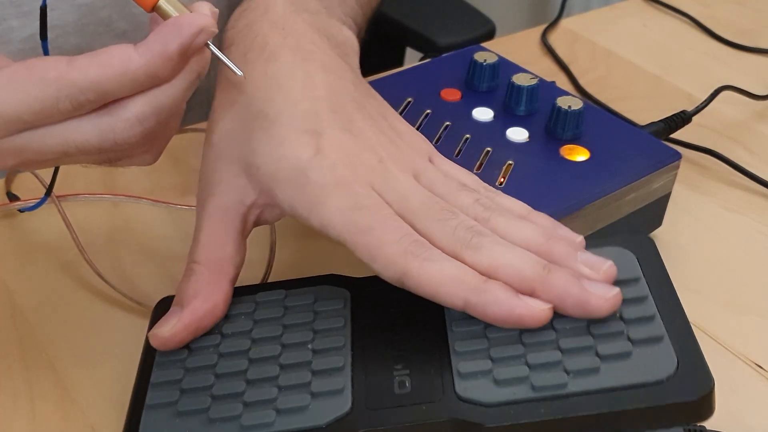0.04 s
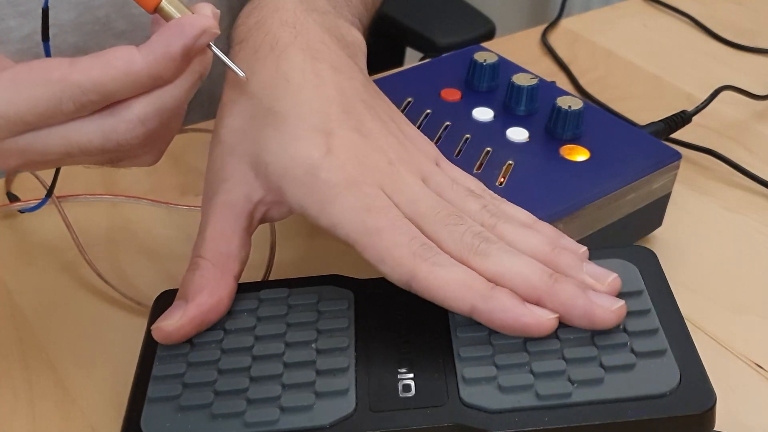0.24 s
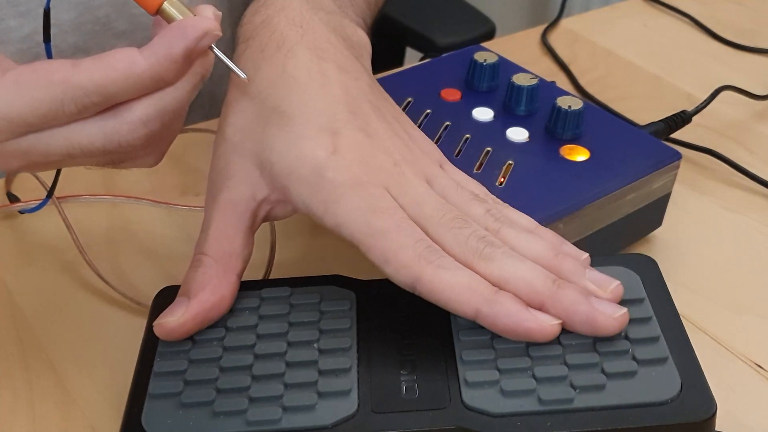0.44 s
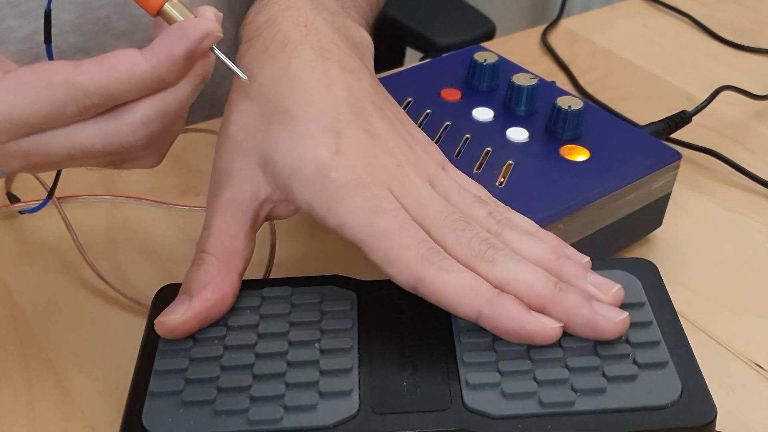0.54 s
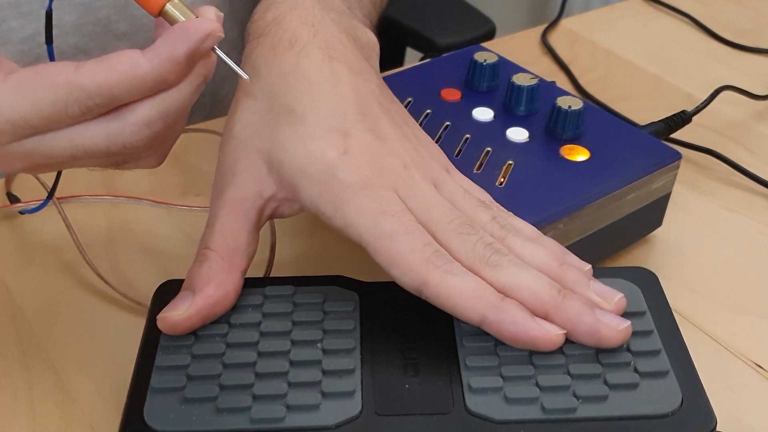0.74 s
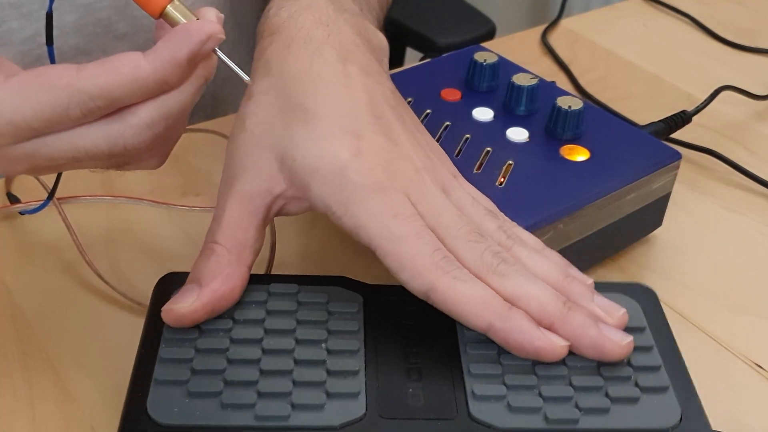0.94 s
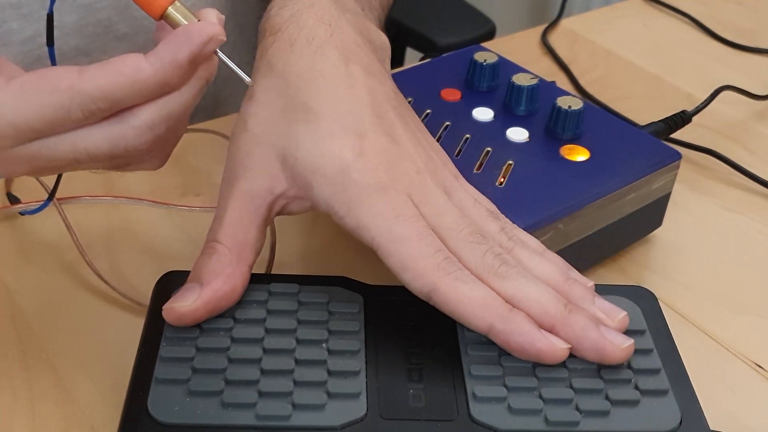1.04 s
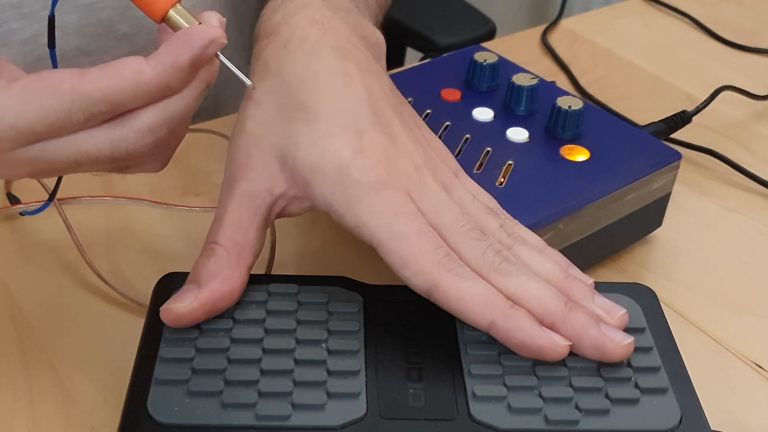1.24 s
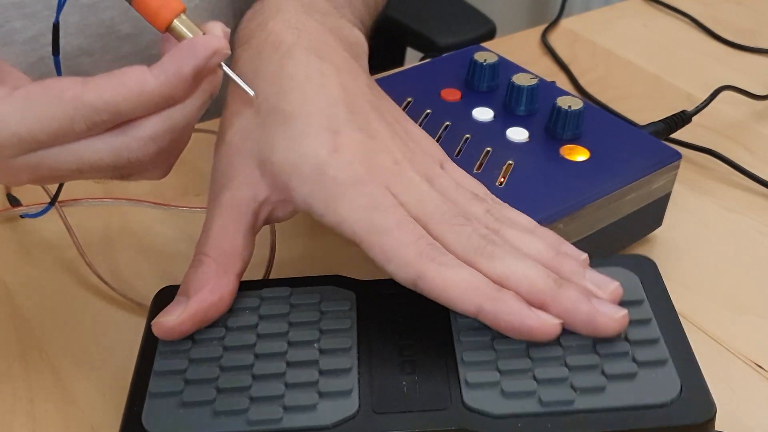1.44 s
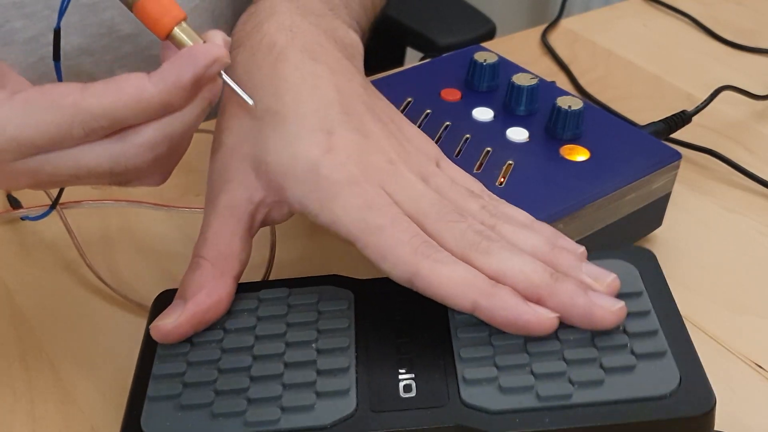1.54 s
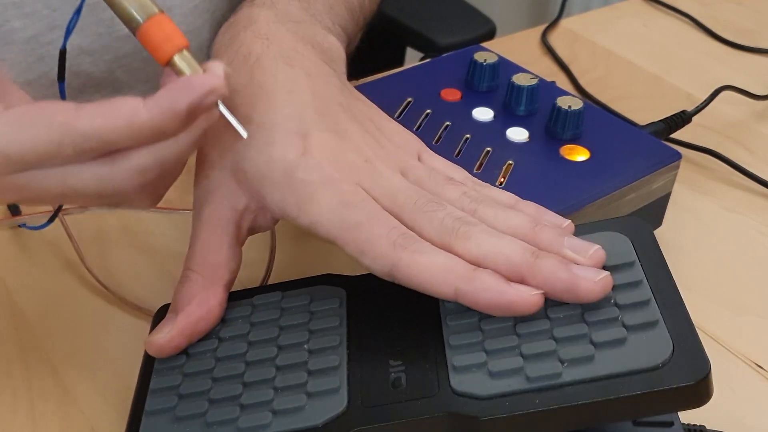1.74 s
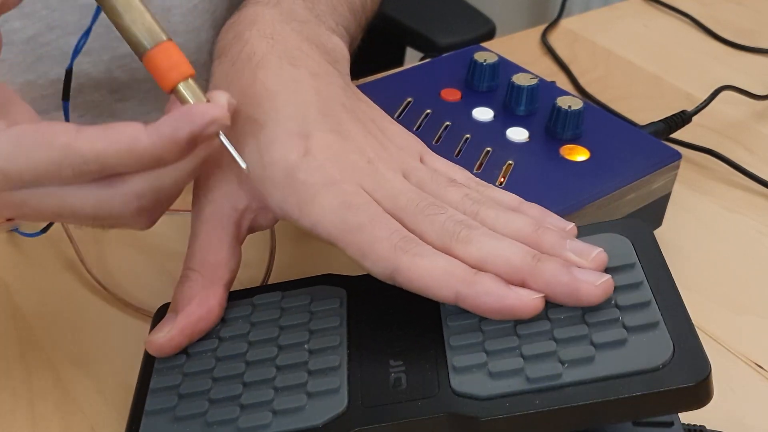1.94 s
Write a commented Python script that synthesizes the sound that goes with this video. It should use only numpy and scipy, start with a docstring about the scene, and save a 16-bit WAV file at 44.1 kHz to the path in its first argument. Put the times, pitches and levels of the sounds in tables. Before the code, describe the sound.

Close to the microphone in a small workshop, an electric engraving tool hammers in one burst. Its sharp, ringing taps quicken into a rattling buzz, hold there, and spread out again before stopping, over a faint low rumble.

```python
"""Solenoid engraver in a small workshop

A hand-held engraver works just right of a stereo microphone. A hand presses the pedal and the plunger
speeds up from single blows to a fast buzz, then slows again. Each blow thuds in the barrel, rings the
metal and rattles the tip; near walls echo it and the room answers. The pedal creaks faintly and bumps
the table, over quiet workshop air and the low rumble of the tool."""
import sys
import numpy as np
from scipy import signal
from scipy.fft import rfft, irfft
from scipy.io import wavfile

SR = 44100
rng = np.random.default_rng(int(sys.argv[2]) if len(sys.argv) > 2 else 0)


def dump(signal):
    """Clip the signal to [-1, 1] and save it as 16-bit WAV at the path in sys.argv[1]."""
    limited = np.clip(np.atleast_2d(signal).T, -1, 1)
    pcm = np.round(limited * 32767).astype(np.int16)
    wavfile.write(sys.argv[1], SR, pcm)


N = 88200


def undb(db):
    return 10 ** (np.asarray(db, float) / 20)


def decay(t, t60):
    return np.exp(-np.log(1000) * t / t60)


def at(table, hz):
    """Read (Hz, value) points on a log-frequency axis."""
    freqs, values = np.array(table, float).T
    return np.interp(np.log(np.maximum(hz, 1)), np.log(freqs), values)


def noise(spectrum, shared, size):
    """Stereo noise at rms 1, with a fraction of its power shared by both sides."""
    white = rng.standard_normal((3, size))
    pair = np.sqrt(shared) * white[0] + np.sqrt(1 - shared) * white[1:]
    gain = undb(at(spectrum, np.fft.rfftfreq(size, 1 / SR)))
    coloured = irfft(rfft(pair) * gain, size)
    return coloured / np.sqrt(np.mean(coloured ** 2))


def ring(t, modes, chance=0, scatter_db=1.2, detune=0.004):
    """Decaying sines from t = 0; chance shifts each level and pitch."""
    hz, db, t60 = np.array(modes, float).T[:, :, None]
    shift = np.zeros((len(modes), 2)) + chance
    level = undb(db + scatter_db * shift[:, :1])
    pitch = hz * (1 + detune * shift[:, 1:])
    t = np.maximum(t, 0)
    return np.sum(level * np.sin(2 * np.pi * pitch * t) * decay(t, t60), axis=0)


def add(out, sound, start_s):
    start = int(start_s * SR)
    count = min(sound.shape[-1], N - start)
    out[..., start:start + count] += sound[..., :count]


# Plunger blows, near the microphone (time [s], clack level [dB], treble level [dB])
BLOWS = [(0.202, -32.1, -30.6), (0.2562, -25.0, -23.9), (0.301, -24.0, -23.5), (0.3444, -23.2, -21.8),
         (0.3856, -22.7, -21.6), (0.4226, -22.3, -21.8), (0.4575, -22.7, -22.5), (0.4899, -22.8, -21.7),
         (0.5199, -22.0, -21.3), (0.5483, -23.2, -22.1), (0.5758, -21.1, -21.4), (0.6035, -22.1, -21.4),
         (0.6288, -21.8, -20.5), (0.6525, -23.2, -22.9), (0.6777, -21.9, -21.6), (0.7013, -21.6, -20.6),
         (0.7235, -20.7, -21.2), (0.7438, -22.6, -21.9), (0.7648, -21.5, -20.6), (0.7843, -22.4, -22.2),
         (0.8035, -22.0, -21.5), (0.823, -21.3, -21.0), (0.8414, -22.6, -20.9), (0.86, -22.2, -22.1),
         (0.8774, -22.0, -21.3), (0.8952, -22.3, -21.2), (0.9124, -21.4, -22.0), (0.9289, -22.2, -21.6),
         (0.945, -22.5, -21.0), (0.9596, -21.6, -22.1), (0.9763, -22.0, -21.0), (0.9932, -21.9, -22.1),
         (1.0089, -23.1, -21.1), (1.0248, -21.9, -21.3), (1.0394, -21.9, -23.4), (1.0562, -21.1, -21.1),
         (1.0731, -21.1, -20.7), (1.0877, -23.7, -22.2), (1.1046, -21.9, -20.4), (1.1207, -22.4, -21.2),
         (1.1364, -22.4, -21.0), (1.1529, -21.2, -20.8), (1.1677, -23.0, -22.7), (1.1844, -20.9, -20.3),
         (1.2006, -21.1, -21.6), (1.2146, -25.1, -24.4), (1.2326, -21.3, -20.8), (1.2489, -22.4, -20.8),
         (1.2646, -21.4, -21.5), (1.2805, -20.5, -21.5), (1.2944, -25.7, -22.6), (1.3126, -21.3, -21.0),
         (1.3287, -21.1, -20.9), (1.3434, -22.1, -22.0), (1.3603, -21.4, -21.0), (1.3771, -21.5, -21.8),
         (1.3928, -22.0, -21.3), (1.4087, -21.5, -20.9), (1.4233, -22.0, -22.5), (1.4401, -21.3, -20.8),
         (1.4569, -21.1, -20.6), (1.4717, -23.8, -21.5), (1.4884, -21.0, -20.5), (1.5057, -21.8, -23.1),
         (1.5271, -20.3, -21.8), (1.5496, -21.8, -22.0), (1.5749, -20.8, -20.8), (1.6019, -21.5, -21.1),
         (1.631, -20.6, -22.0), (1.6664, -20.7, -20.9), (1.7113, -22.0, -21.4)]
# Broad, quickly damped barrel resonances (frequency [Hz], level [dB], t60 [s])
BARREL_MODES = [(605, -19.5, 0.0084), (793, -26, 0.05), (1080, -9.5, 0.009), (1310, 3.5, 0.0061),
                (1574, 3.5, 0.0056), (2444, -7.5, 0.011), (3257, -8, 0.014), (4294, -13.5, 0.014)]
# Metal modes of plunger and tip (frequency [Hz], level [dB], t60 [s])
METAL_MODES = [(5300, -11.5, 0.015), (6078, -10.5, 0.048), (6210, -12, 0.036), (6960, -8.5, 0.013),
               (8430, -5, .008), (9190, -7, 0.012), (11320, -14, 0.018), (11100, -12.5, 0.06),
               (11580, -10.5, 0.023)]
# Rattle of the tip (frequency [Hz], relative level [dB])
RATTLE_SPECTRUM = [(1000, -47), (2000, -3.5), (3000, -4), (5000, -3.5), (6100, -0.5), (7400, -6.5),
                   (9000, -1.5), (11500, -4.5), (13000, -6), (15500, -6.5), (17000, -47)]
def engraver(rattle_db=-2.5, chatter_db=-41, radiates_hz=480):
    """Each blow: the same dull barrel clack, then a metal ring and a rattle that differ every time."""
    out, t = np.zeros((2, N)), np.arange(5000) / SR
    sides = (t, t - 0.00005)  # left, right: a slight lag between the channels
    barrel_times = [np.maximum(side - 0.00034, 0) for side in sides]
    clack = np.array([ring(u, BARREL_MODES) * (1 - np.exp(-u / 0.00048)) for u in barrel_times])
    hiss = noise(RATTLE_SPECTRUM, shared=0.43, size=N)
    rattle_s = np.array([[0.0035], [0.0027]])  # left, right
    burst = (1 - np.exp(-(t / 0.001) ** 2)) * np.exp(-(t / rattle_s) ** 2)
    # The loose plunger chatters on after every blow, however soft.
    chatter = undb(chatter_db) * (1 - np.exp(-t / 0.0047)) * decay(t, t60=0.18)
    for start, clack_db, treble_db in BLOWS:
        chance = rng.standard_normal((len(METAL_MODES), 2))
        metal = np.array([ring(side - 0.001005, METAL_MODES, chance) for side in sides])
        grit = np.roll(hiss, -int(start * SR), axis=1)[:, :len(t)]
        rattle = grit * burst * np.std(burst) / np.std(grit * burst)  # as strong as its envelope
        treble = metal + undb(rattle_db) * rattle
        add(out, undb(clack_db) * clack + undb(treble_db) * treble + chatter * grit, start)
    # The tool is too small to radiate bass.
    return signal.sosfilt(signal.butter(4, radiates_hz, "high", fs=SR, output="sos"), out)


# Table and walls close to the microphone (delay [s], left level [dB], right level [dB])
ECHOES = [(.0017, -12.5, -32), (.0062, -41.5, -5.5), (.0085, -6, -23), (.0098, -23, -13.5),
          (0.0115, -27, -11.5), (0.013, -6, -25.5)]
def near_echoes(tool):
    """Each nearby surface returns one late, weaker copy of the tool."""
    out = np.zeros((2, N))
    for delay, left_db, right_db in ECHOES:
        add(out, undb([[left_db], [right_db]]) * tool, delay)
    return out


# Decay of the small workshop (frequency [Hz], t60 [s])
ROOM_T60 = [(300, .35), (800, .4), (1500, .31), (3000, .34), (6100, .35), (8000, .27), (11000, .23),
            (15000, .16)]
# Colour of its reverberation at the microphone (frequency [Hz], relative level [dB])
ROOM_SPECTRUM = [(300, 0.012), (800, 0.5), (1400, -2.5), (2200, 0), (4000, 0.036), (6100, -1),
                 (8000, 0.0097), (11500, 0), (15000, 0.0032)]
def room(tool, rise_s=0.01, size=2 ** 15):
    """Dense reflections build up quickly and die sooner in the treble."""
    t, tail = np.arange(size) / SR, 0
    freqs = np.maximum(np.fft.rfftfreq(size, 1 / SR), 1)
    spectrum = rfft(noise(ROOM_SPECTRUM, shared=0.21, size=size))
    for hz in 100 * 2 ** np.arange(0, 8, 0.5):  # half-octave bands
        band = np.maximum(1 - 2 * abs(np.log2(freqs / hz)), 0)
        tail += irfft(spectrum * band, size) * decay(t, at(ROOM_T60, hz))
    tail *= (1 - np.exp(-(t / rise_s) ** 2)) * undb([[-34], [-27]])  # left, right
    return signal.fftconvolve(tool.mean(axis=0)[None], tail, axes=1)[:, :N]


# Table under the pedal (frequency [Hz], level [dB], t60 [s])
TABLE_MODES = [(60, -11, 0.23), (91.3, -1, 0.27), (117, 1.5, .1), (131.4, 3, 0.3), (180, -9, .06)]
# A bump and a fainter one just after, a little to the right (time [s], level [dB])
BUMPS = [(1.077, -38.5), (1.132, -49)]
# Rubs of the pedal hinge (time [s], length [s], level [dB])
CREAKS = [(0.101, 0.25, -70), (1.777, 0.12, -59.5)]
# Pedal housing, rung by the hinge (frequency [Hz], relative level [dB])
HOUSING_SPECTRUM = [(300, -8), (560, -10), (650, 6.5), (720, -14), (800, 0), (950, -16), (1450, -37),
                    (1600, -3), (1800, -15), (2300, -5), (2600, -25), (2900, -11), (5000, -35), (8000, -40)]
def pedal(push_s=0.01):
    """Soft bumps ring the table; the hinge rubs as the pedal starts and ends its travel."""
    out, t = np.zeros((2, N)), np.arange(SR // 2) / SR
    thump = ring(t, TABLE_MODES) * (1 - np.exp(-t / push_s))
    for start, db in BUMPS:
        add(out, undb([[db - 2.5], [db]]) * thump, start)
    for start, length, db in CREAKS:
        swell = np.sin(np.pi * np.clip(t / length, 0, 1))
        add(out, undb(db) * swell * noise(HOUSING_SPECTRUM, shared=0.54, size=len(t)), start)
    return out


# Rumble of the tool at the microphone (time [s], level [dB])
RUMBLE_LEVELS = [(0.0, -73), (0.18, -75.5), (0.51, -66.5), (0.77, -65.5), (0.97, -63), (1.35, -60.5),
                 (2.0, -74.5)]
def rumble():
    """Low vibration travels through hand and table, rising while the tool runs."""
    times, db = np.array(RUMBLE_LEVELS).T
    spectrum = [(20, -28.5), (50, -2.5), (120, -5.5), (250, -2), (400, -19.5), (700, -51)]  # Hz, dB
    return undb(np.interp(np.arange(N) / SR, times, db)) * noise(spectrum, shared=0.85, size=N)


# Room tone all around the microphone (frequency [Hz], relative level [dB])
AIR_SPECTRUM = [(15, -19), (25, -17), (87, 3), (185, -3), (223, -6.5), (335, -10), (363, -31), (405, -14),
                (695, -13.5), (16000, -36)]
def workshop_air(level_db=-75.5):
    """A faint, steady hush, strongest in the bass."""
    return undb(level_db) * noise(AIR_SPECTRUM, shared=0.29, size=N)


def scene():
    """The workshop from the microphone, with the tool on the right."""
    tool = engraver()
    direct = tool * undb([[-1], [5.5]])  # left, right
    return direct + near_echoes(tool) + room(tool) + pedal() + rumble() + workshop_air()


def record(dry, ceiling=0.62, top_hz=15900):
    """The recorder rounds the sharpest peaks and cuts the top."""
    soft = ceiling * np.tanh(dry / ceiling)
    return signal.sosfilt(signal.ellip(9, 0.3, 80, top_hz, fs=SR, output="sos"), soft)


dry = scene()
out = record(dry)
dump(out)
```